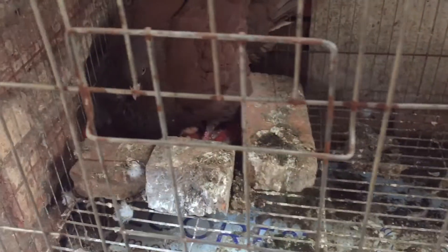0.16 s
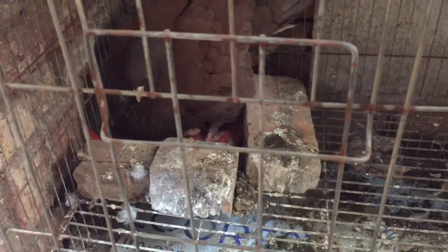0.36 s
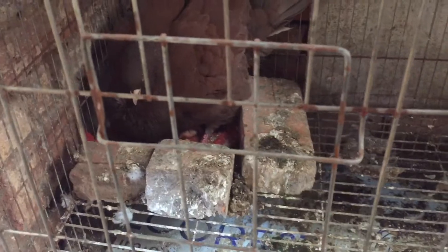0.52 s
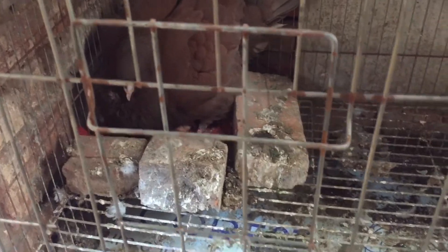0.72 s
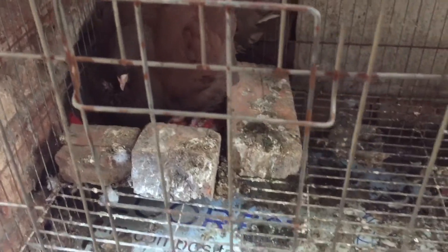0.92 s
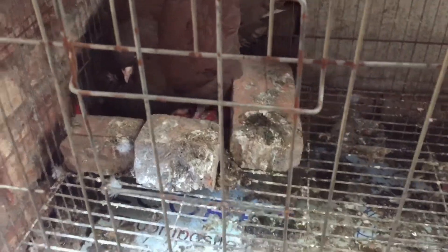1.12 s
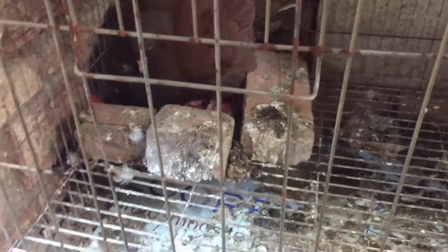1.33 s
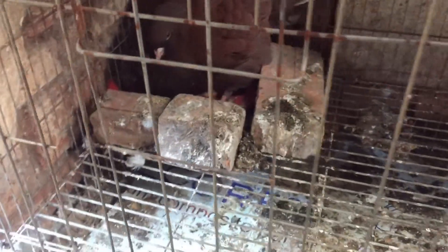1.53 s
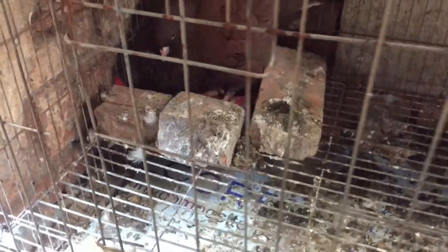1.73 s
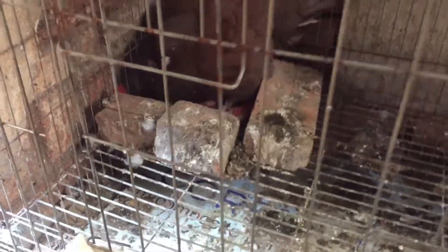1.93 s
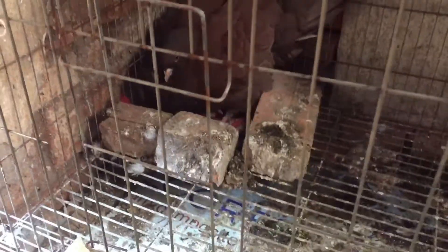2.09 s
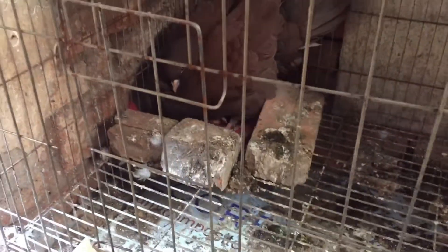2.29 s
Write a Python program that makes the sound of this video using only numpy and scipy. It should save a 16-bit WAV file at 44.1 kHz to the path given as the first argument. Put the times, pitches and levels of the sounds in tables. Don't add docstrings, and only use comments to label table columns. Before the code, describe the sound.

A pigeon coos close by, a clear note at 0.1 s and a rolled, gurgling one from 0.25 to 0.6, over scuffling feet. A hoarse, higher bird answers faintly near 0.65 and 1.0. Low clucks crowd 1.1 to 1.75 with growing scuffs; a wire knock clatters at 1.75 as another coo sinks until 2.1. Soft wing flaps follow at 2.15. Dull hum, short brick echoes.

```python
import sys
import numpy as np
from scipy import signal
from scipy.io import wavfile

SR = 44100
rng = np.random.default_rng(int(sys.argv[2]) if len(sys.argv) > 2 else 0)


def gain_from_db(level_db):
    decades = np.asarray(level_db, float) / 20
    return 10 ** decades


def transcribe(u):
    v = np.clip(np.atleast_2d(u).T, -1, 1)
    q = np.round(v * 32767).astype(np.int16)
    wavfile.write(sys.argv[1], SR, q)


N = 103635


def rms_one(x):
    return x / np.sqrt(np.mean(x ** 2) + 1e-20)


def add(track, start_s, sound):
    i = max(int(start_s * SR), 0)
    track[i:i + len(sound)] += sound[:N - i]


def drift(rate_hz):
    r = np.exp(-2 * np.pi * rate_hz * 40 / SR)
    slow = signal.lfilter([1], [1, -2 * r, r * r], rng.standard_normal(N // 40 + 2002))[2000:]
    return np.interp(np.arange(N) / 40, np.arange(len(slow)), rms_one(slow))


def ring(x, hz, t60_s):
    r, w = gain_from_db(-60 / (t60_s * SR)), 2 * np.pi * hz / SR
    return signal.lfilter([0, np.sin(w)], [1, -2 * r * np.cos(w), r * r], x + 1e-18)


def band(x, low_hz, high_hz):
    sos = signal.butter(2, [low_hz, min(high_hz, 0.45 * SR)], "band", fs=SR, output="sos")
    return signal.sosfilt(sos, x)


def swell(length_s, attack_s):
    t = np.arange(int((attack_s + 2 * length_s) * SR)) / SR
    rise = np.sin(np.pi / 2 * np.clip(t / attack_s, 0, 1)) ** 2
    fall = np.exp(-2 * (np.maximum(t - attack_s, 0) / length_s) ** 2)
    return t, rise * fall


def glide(hz):
    return np.sin(2 * np.pi * np.cumsum(hz) / SR)


# time_s, pitch_hz, level_db
CLEAR_COO = [
    (0.117, 404, -20),
    (0.132, 382.5, -5.5),
    (0.142, 349, -16),
    (0.159, 321, -16.5),
    (0.188, 354, -10),
    (0.273, 356.4, -10.5),
    (0.283, 415, -15.5),
    (0.301, 384, -6.5),
    (0.323, 375, -21),
]
ROLLED_COO = [
    (0.256, 340.7, -26.5),
    (0.324, 330, -16),
    (0.364, 328.3, -18.5),
    (0.421, 366.9, -12.5),
    (.45, 328.5, -17.5),
    (0.481, 300.4, -11.5),
    (0.519, 303.7, -17.5),
    (.56, 325, -32),
    (.62, 329, -34.5),
]
LATE_COO = [
    (1.734, 346.5, -8.5),
    (1.783, 344.3, -19.5),
    (1.861, 354.7, -14),
    (1.874, 343, -27.5),
    (1.885, 333.5, -17),
    (1.926, 324.7, -16),
    (1.973, 298.6, -14.5),
    (2.011, 263.6, -24),
    (2.101, 303, -33),
]


def coo(line, roll, crop_db):
    time_s, pitch_hz, level_db = np.transpose(line)
    t = np.arange(N) / SR
    fade_in = np.clip((t - time_s[0]) / 0.011, 0, 1)
    fade_out = np.clip((time_s[-1] - t) / 0.016, 0, 1)
    level = gain_from_db(np.interp(t, time_s, level_db)) * fade_in * fade_out

    rolls_per_s, jitter, spread_db = 71, 0.2184, 0.5
    beat = np.cumsum(rolls_per_s * (1 + jitter * drift(30.56))) / SR
    k = beat.astype(int)
    strength, slip = rng.standard_normal((400, 2))[k].T
    puff = np.sin(np.pi * (beat % 1)) * gain_from_db(spread_db * np.clip(strength, -1, 1))

    phase = 2 * np.pi * np.cumsum(np.interp(t, time_s, pitch_hz)) / SR
    steady = np.sin(phase) + gain_from_db(-41.5) * np.sin(2 * phase)
    rolled = 2.0 * band(puff * np.sin(phase + 2 * slip), 173, 465)
    tone = np.sqrt(2) * ((1 - roll) * steady + roll * rolled)
    clicks = level * np.diff(k, prepend=0) * np.sign(slip)
    return level * tone + roll * gain_from_db(crop_db) * crop(clicks)


# pitch_hz, level_db, t60_s
CROP_MODES = [(230, -12, 0.25), (398.8, -1.5, 0.075), (541.7, -6.5, 0.039)]


def crop(puffs):
    soft = band(band(puffs, 150, 640), 150, 640)
    return sum(gain_from_db(db + 2.2 * drift(24.2)) * ring(soft, hz, t60_s) for hz, db, t60_s in CROP_MODES)


# start_s, peak_db, pitch_hz, length_s
CLUCK_NOTES = [(0.01, -16.5, 289, 0.0048), (0.949, -16, 371, 0.034), (.946, -15.5, 209, 0.017),
               (1.108, -11, 270, 0.0058), (1.118, -19.5, 253, 0.013), (1.115, -18.5, 397, 0.021),
               (1.258, -2, 379.4, .014), (1.279, -14.5, 423, 0.021), (1.298, -39, 398, 0.045),
               (1.352, -5.5, 295, 0.01), (1.449, -23.5, 295, 0.023), (1.515, -5.5, 301, 0.007),
               (1.562, -15.5, 246, 0.011), (1.614, -19.5, 409, 0.041), (1.643, -10.5, 337, 0.015),
               (1.661, -9.5, 292, 0.01), (1.717, -7.5, 271, 0.0024), (1.98, -5, 300, 0.0048),
               (0.496, -10, 257, 0.0073), (.74, -26.5, 204, 0.028), (1.356, -13.5, 553, 0.01),
               (1.524, -16, 540, 0.0088), (.011, -24, 553, 0.0074), (0.078, -23, 470, 0.0063),
               (0.097, -18, 389.4, 0.017), (0.141, -12.5, 355, .006), (.947, -33.5, 538, 0.018),
               (1.104, -27, 535, 0.012), (1.152, -25.5, 257, .016), (1.26, -30, 700, 0.0076),
               (1.367, -17, 348, .008), (1.673, -19.5, 536, .012), (1.722, -20.5, 636, 0.0056),
               (1.766, -22, 216, 0.0086), (1.79, -17.5, 179, 0.016), (1.901, -19, 199, 0.051), ]


def clucks():
    attack_s, sag, puff_db = 0.00829, 0.018, -9
    out, puffs = np.zeros(N), np.zeros(N)
    for start_s, db, hz, length_s in CLUCK_NOTES:
        t, shape = swell(length_s, attack_s)
        pitch_hz = hz * (1 + sag * (0.5 - t / length_s))
        add(out, start_s, gain_from_db(db) * shape * glide(pitch_hz))
        puffs[int((start_s + attack_s / 2) * SR)] = gain_from_db(db + puff_db)
    return out + crop(puffs)


# start_s, peak_db,
# pitch_hz, end_pitch_hz, length_s
FAR_NOTES = [(.640, -20, 563, 560, .022), (.670, -22, 750, 735, .04), (.673, -25, 545, 540, .045),
             (.715, -27, 720, 690, .03), (1.006, -24, 580, 600, .018), (1.007, -26, 740, 720, .014),
             (1.03, -31, 640, 700, .035), (2.06, -26, 560, 620, .05), (2.085, -31, 680, 740, .035),
             (.312, -25, 560, 540, .05), (.37, -28, 560, 560, .05), (.435, -25, 550, 560, .05),
             (.255, -31, 570, 570, .02)]


def far_bird():
    out = np.zeros(N)
    for start_s, db, hz, end_hz, length_s in FAR_NOTES:
        t, shape = swell(length_s, 0.007)
        add(out, start_s, gain_from_db(db) * shape * glide(hz + (end_hz - hz) * t / length_s))
    breath = rms_one(band(band(rng.standard_normal(N), 35, 110), 20, 110))
    return out * (0.9 + 0.42 * breath)


# start_s, level_db,
# length_s, centre_hz, width_octaves
SCUFFS = [(.045, -40.5, 0.019, 6000, 3.5), (.09, -44, 0.12, 2210, 3.7), (.16, -53.5, 0.032, 12800, 0.95),
          (.205, -41.5, 0.081, 3450, 2.04), (.52, -41, 0.064, 10600, 1.2), (.595, -41, 0.079, 2966, 1.07),
          (.3, -60, 0.46, 6000, 3.7), (.92, -43, 0.072, 2990, 2), (0.973, -51.5, 0.17, 2890, 1.2),
          (1.185, -40.5, 0.14, 2450, 2), (1.25, -36.5, 0.17, 2790, 1.1), (1.425, -50.5, 0.052, 1870, 1.9),
          (1.48, -33, 0.075, 2620, 4.2), (1.53, -31.5, 0.1, 1000, 2.96), (1.605, -31, 0.087, 3870, 2.7),
          (1.685, -29, 0.081, 4000, 3.26), (1.8, -44.5, .12, 1010, 1.85), (2.1, -42.5, 0.067, 870, 0.49),
          (1.712, -40.5, 0.062, 2050, 0.86), (1.74, -42, .22, 683, 0.79), (1.5, -48, 0.24, 4930, 2.5),
          (.78, -58, 0.12, 900, 2), (1.54, -40, 0.21, 975, .35), (2.25, -59, 0.059, 5030, 5.7),
          (.51, -28, 0.092, 297, 0.73), (1.53, -27.5, 0.091, 302, 1.3), (1.62, -27, 0.097, 336, 0.96),
          (0, -36, .1, 300, 1.58), (.58, -35.5, 0.23, 235, 1.22), (.92, -38, 0.35, 230, 1.16),
          (1.98, -34, 0.27, 263, 1.31)]
# start_s, level_db, length_s, centre_hz, width_octaves
SUDDEN_CLATTERS = [
    (0, -36.5, 0.18, 1600, 4.1),
    (.49, -33.5, 0.033, 4000, 7.5),
    (1.752, -26.5, 0.1, 5050, 3.6),
    (2.004, -32.5, 0.026, 5500, 2.06),
    (2.025, -41, .03, 5000, 2.4),
    (2.322, -45, 0.058, 8340, 0.5),
]


def rustles():
    grain_db, air_db, mesh_db, mesh_patchy_db = 2, -12, -5, 6.0
    out = np.zeros(N)
    grains = rng.standard_normal(N + SR) * np.resize(gain_from_db(grain_db * drift(140)), N + SR)
    for rows, attack in (SCUFFS, 0.37), (SUDDEN_CLATTERS, 0.004):
        for start_s, db, length_s, hz, octaves in rows:
            t, shape = swell(0.71 * length_s, attack * length_s)
            noise = grains[max(int(start_s * SR), 0):][:len(t)]
            dulled = signal.lfilter([1], [1, -0.7], noise)
            half_width = 2 ** (octaves / 2)
            body = rms_one(band(dulled, hz / half_width, hz * half_width))
            air = (hz > 700) * gain_from_db(air_db) * rms_one(band(noise, 4900, 18600))
            add(out, start_s, gain_from_db(db) * shape * (body + air))
    mesh = np.zeros(N)
    for hz in 1000 * 2 ** rng.uniform(0, 3.8, 30):
        touched = out * gain_from_db(mesh_patchy_db * drift(20.0))
        mesh += ring(touched, hz, 50 / hz) * np.sqrt(hz / SR)
    return out + gain_from_db(mesh_db) * mesh * np.std(out) / np.std(mesh)


# start_s, peak_db, pitch_hz
WIRE_TICKS = [(0.71, -27.5, 3165), (1.292, -22.5, 2420), (1.444, -30, 1360), (1.5, -23.5, 1314),
              (1.629, -25.5, 2840), (1.72, -15.5, 1990), (2.006, -28.5, 2080), (.053, -28, 2100),
              (0.241, -29, 4600), (0.639, -33, 2530), (.946, -30.5, 1720), (1.221, -35, 2070),
              (1.236, -26.5, 2400), (1.557, -21, 1040), (1.649, -18.5, 3890), (1.727, -17, 2120),
              (1.738, -24, 2110), (1.757, -16, 4445), (1.765, -21, 4670), (1.766, -28, 1800),
              (1.757, -25, 6000), (1.773, -23, 5930), (1.796, -26, 5880), (1.764, -23, 7070),
              (1.867, -30.5, 1734), (2.005, -31, 3510), (2.006, -32, 4700), (2.028, -34, 3250),
              (2.03, -33, 2052), (1.345, -38, 1860)]
# pitch_hz, level_db, t60_s
MESH_MODES = [(1682, 13.5, 0.014), (3460, -3.5, 0.018), (4590, 3, 0.02), (6000, 1, 0.011),
              (7360, -7, 0.023)]


def wire():
    tick_t60_s = 0.028
    knock_s, knock_db, knock_rise_s = 1.7508, -14.5, 0.0042
    rattles_per_s, rattle_t60_s = 1300, 0.055
    out, t = np.zeros(N), np.arange(SR // 4) / SR
    for start_s, db, hz in WIRE_TICKS:
        shape = gain_from_db(db - 60 * t / tick_t60_s) * np.minimum(t / 0.0015, 1)
        add(out, start_s, shape * np.sin(2 * np.pi * hz * t))
    for hz, db, t60_s in MESH_MODES:
        hits = (rng.random(len(t)) < rattles_per_s / SR) * rng.standard_normal(len(t))
        rattle = hits * gain_from_db(-8.5 - 60 * t / rattle_t60_s)
        rattle[0] = 1
        rise = np.minimum(t / knock_rise_s, 1)
        add(out, knock_s, gain_from_db(knock_db + db) * rise * ring(rattle, hz, t60_s))
    return out


# start_s, peak_db, pitch_hz, length_s
WING_PUSHES = [
    (0.077, -25.5, 111.6, 0.063),
    (0.483, -21.5, 87, 0.02),
    (1.55, -23.5, 150, 0.084),
    (1.72, -27, 142.2, 0.16),
    (1.878, -26.5, 107, 0.037),
    (2.12, -22, 157, 0.031),
    (2.156, -17.5, 122, 0.023),
    (2.18, -21, 144, 0.034),
    (2.23, -28, 136.5, 0.033),
    (2.31, -38, 133, 0.056),
]


def wings():
    out = np.zeros(N)
    for start_s, db, hz, length_s in WING_PUSHES:
        t, shape = swell(length_s, 0.26 * length_s)
        add(out, start_s, gain_from_db(db) * shape * np.sin(2 * np.pi * hz * t))
    return out * (1 + 0.45 * rms_one(band(rng.standard_normal(N), 15, 60)))


def cage(x):
    t60_s, wall_cut_hz = 0.17, 3700
    out, dull = np.zeros(N), np.exp(-2 * np.pi * wall_cut_hz / SR)
    lags = (rng.uniform(0.009, 0.035, 8) * SR).astype(int)
    for k, lag in enumerate(lags):
        loop, gain, state = x.copy(), gain_from_db(-60 * lag / SR / t60_s), [0.0]
        for i in range(lag, N, lag):
            back, state = signal.lfilter([gain * (1 - dull)], [1, -dull], loop[i - lag:i], zi=state)
            loop[i:i + lag] += back[:N - i]
        out += (loop - x) * (-1) ** k
    return out


# pitch_hz, level_db (per Hz)
HUM_COLOUR = [(24, -60), (45, 16), (150, 11.5), (480, -10), (800, -9), (1300, -12), (2120, -13),
              (2790, -13.5), (15600, -24)]


def hum():
    level_db, patchy_db = -38.5, 1.2
    lull_s, lull_length_s, lull_depth_db = 0.836, 0.044, -8.5
    lull_db = lull_depth_db * np.exp(-((np.arange(N) / SR - lull_s) / lull_length_s) ** 2)
    out, together = np.zeros(N), drift(15.0)
    edges_hz = 22 * 2 ** np.arange(0, 10, 0.5)
    white = rng.standard_normal((2, N + SR // 4))
    at_hz, at_db = np.transpose(HUM_COLOUR)
    for k, (low, high) in enumerate(zip(edges_hz, edges_hz[1:])):
        band_db = np.interp(np.log(low * high) / 2, np.log(at_hz), at_db)
        flicker_db = patchy_db * (together + drift(7.0))
        gain = gain_from_db(band_db + (low < 250) * lull_db + flicker_db)
        out += gain * band(white[k % 2], low, high)[-N:]
    return gain_from_db(level_db) * rms_one(out)


def scene():
    coos = coo(CLEAR_COO, roll=0.11, crop_db=-47)
    coos = coos + coo(ROLLED_COO, roll=0.6, crop_db=6)
    coos = coos + coo(LATE_COO, roll=0.38, crop_db=1)
    far = far_bird()
    close = clucks() + wire() + rustles()
    echoes = gain_from_db(-10.5) * cage(close + gain_from_db(-0.5) * coos) + gain_from_db(-20) * cage(far)
    return (coos + close + far + echoes + wings() + hum())[None]


def roll_off(x):
    return signal.sosfilt(signal.butter(12, 15800, fs=SR, output="sos"), x)


def record(dry):
    x = signal.sosfilt(signal.butter(4, 49.8, "high", fs=SR, output="sos"), dry)
    for hz, depth in (5000, 0.28), (10400, 0.49):
        x = x - depth * signal.lfilter(*signal.iirpeak(hz, 7, SR), x)
    x = signal.sosfilt(signal.cheby2(12, 60, 16000, fs=SR, output="sos"), x)
    overload = 4
    mix = overload * np.tanh(x / overload)
    return roll_off(mix)


dry = scene()
out = record(dry)
transcribe(out)
```